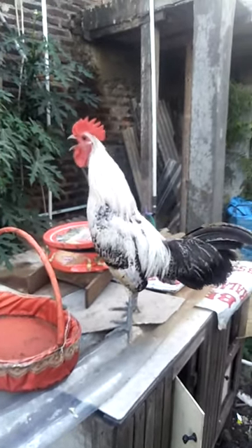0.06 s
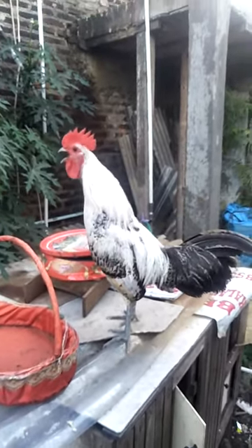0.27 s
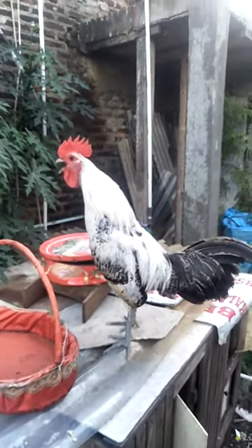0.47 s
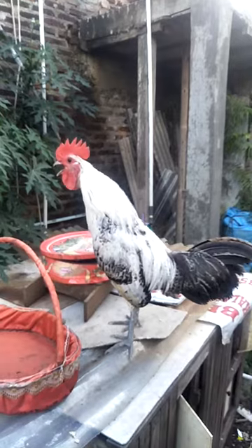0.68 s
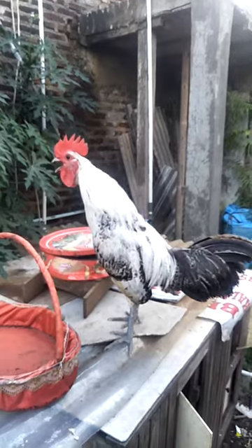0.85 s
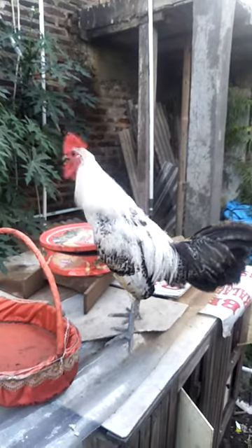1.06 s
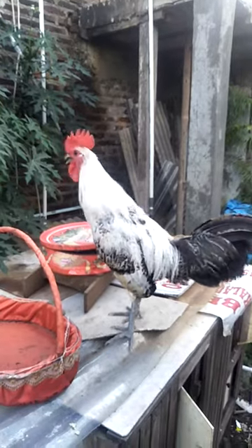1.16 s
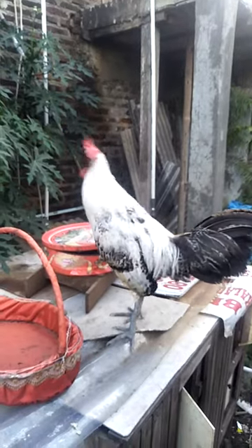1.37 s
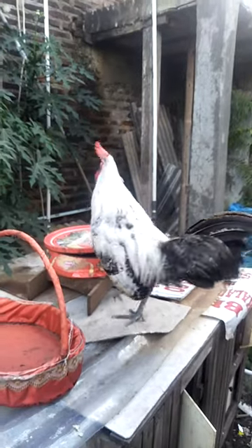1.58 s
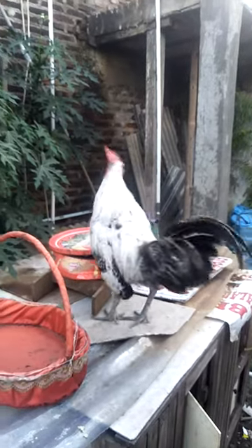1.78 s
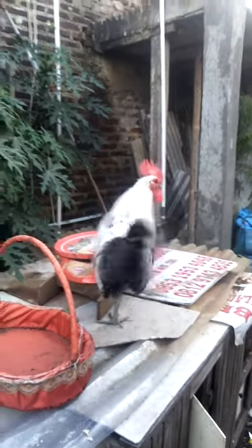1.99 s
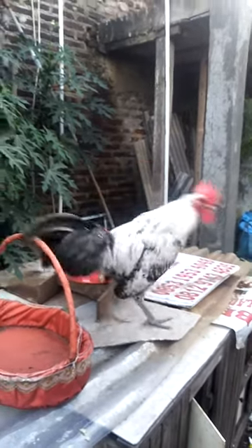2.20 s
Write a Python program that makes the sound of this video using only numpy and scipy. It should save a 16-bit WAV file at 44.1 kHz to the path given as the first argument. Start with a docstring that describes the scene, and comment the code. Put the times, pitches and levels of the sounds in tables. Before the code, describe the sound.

A rooster crows loudly up close, hoarse then clear, cracking into a soft sagging wheeze outdoors.

```python
"""A rooster in a walled yard

A rooster crows close by: a hoarse opening, a long clear note, a cracked fall, a soft sagging wheeze, then air.
Clear notes are sums of harmonics; hoarseness adds a second membrane beating with the voice, and noisy flapping.
Shaped noise makes the breath and the feet, which scuff and tap on the perch as he turns.
The walls add a short tail. A low rumble and a faint hiss lie under everything.
"""
import sys
import numpy as np
from scipy import signal
from scipy.fft import rfft, irfft
from scipy.io import wavfile
from scipy.ndimage import uniform_filter1d, minimum_filter1d, map_coordinates

SR = 44100
rng = np.random.default_rng(int(sys.argv[2]) if len(sys.argv) > 2 else 0)


def put_to_file(sound):
    """Save the sound as 16-bit audio at rate SR, in the file named by the first command-line argument."""
    columns = np.atleast_2d(sound).T  # one column per channel
    safe = np.clip(columns, -1, 1)
    whole_steps = np.round(safe * 32767)
    wavfile.write(sys.argv[1], SR, whole_steps.astype(np.int16))


N = 99225
T = np.arange(N) / SR  # time in seconds
EDGE_HZ = 15650  # top of the sound band
FADE_S = .008  # fade just outside the span of a table
JITTER_HZ = 85.6  # how fast pitch and loudness tremble in the harmonic notes


def amp(db):
    """Turns dB into a plain factor."""
    return 10 ** (np.asarray(db) / 20)


def unit(x):
    """Scales to an average strength (rms) of 1."""
    return x / np.sqrt(np.mean(x ** 2) + 1e-20)


def read(points, hz):
    """Reads a table of frequency and value on a log-frequency axis."""
    f, value = np.transpose(points)
    return np.interp(np.log(hz + 1), np.log(f + 1), value)


def curves(rows):
    """Gives a soft gate over the span of a table, then each column over time."""
    s, *columns = np.transpose(rows)
    gate = np.clip(np.minimum(T - s[0], s[-1] - T) / FADE_S + 1, 0, 1)
    return [np.sin(gate * np.pi / 2) ** 2] + [np.interp(T, s, c) for c in columns]


def colour(x, points):
    """Filters a sound by a spectrum; rms 1."""
    gain = amp(read(points, np.fft.rfftfreq(N, 1 / SR)))
    return unit(irfft(rfft(x) * gain, N))


def noise(points):
    """Makes coloured noise; rms 1."""
    return colour(rng.standard_normal(N), points)


def wander(rate_hz):
    """Drifts smoothly by chance, up to about the given rate; rms 1."""
    smoothing = 1 + (np.fft.rfftfreq(N, 1 / SR) / rate_hz) ** 4
    return unit(irfft(rfft(rng.standard_normal(N)) / smoothing, N))


def phase_of(hz, jitter, rate_hz):
    """Adds up the phase of an oscillator whose pitch trembles by the share jitter."""
    return 2 * np.pi * np.cumsum(hz * (1 + jitter * wander(rate_hz))) / SR


def burst(start, db, rise, decay):
    """Shapes a brief event: a straight rise, then an exponential decay."""
    t = np.maximum(T - start, 0)
    return amp(db) * np.minimum(t / rise, 1) * np.exp(-np.maximum(t - rise, 0) / decay)


def ring(hz, width_hz):
    """Air sounding one narrow resonance; rms 1."""
    turn = 2 * np.pi * hz * T
    return wander(width_hz) * np.cos(turn) + wander(width_hz) * np.sin(turn)


def flaps(hz, jitter, rate_hz, uneven, breath):
    """One pulse a cycle, uneven in time and strength, each with a puff of air."""
    phase = phase_of(hz, jitter, rate_hz)
    pulses = unit(sum(np.cos(k * phase) for k in range(1, 15)))
    pulses = pulses * (1 + uneven * wander(rate_hz))
    puffs = (1 + np.cos(phase)) * rng.standard_normal(N)
    return unit(pulses) + breath * unit(puffs)


def harmonic_note(rows, overtones, order, jitter, shimmer):
    """The lowest partials swell and fade as beak and neck move; overtones follow partial number order."""
    gate, hz, *levels = curves(rows)
    phase = phase_of(hz, jitter, JITTER_HZ)
    low = sum(amp(db) * np.cos(k * phase) for k, db in enumerate(levels, 1))
    high = 0
    for k in range(len(levels) + 1, 24):
        db = levels[order - 1] + read(overtones, k * hz) + 3.2 * wander(15)
        high += amp(db) * np.cos(k * phase) * (k * hz < EDGE_HZ)
    return np.sqrt(2) * gate * (low + high) * (1 + shimmer * wander(JITTER_HZ))


def unsteady_tone(rows, jitter):
    """A single tone of the voice, trembling in pitch and loudness."""
    gate, hz, db = curves(rows)
    wave = np.cos(phase_of(hz, jitter, rate_hz=140)) * (1 + 0.61 * wander(67))
    return gate * amp(db) * unit(wave)


# The long note, with a brief upward yodel.
# Each row: time in seconds, pitch in Hz, levels of partials 1 to 4 in dB.
LONG_NOTE = [(.517, 928.3, -21.5, -14, -34, -42), (.632, 935.4, -25, -13, -34, -42.5),
             (.644, 966, -24.5, -23.5, -43, -48), (.694, 951.4, -18, -18, -30, -43),
             (.712, 916.7, -22, -13, -36, -36), (.805, 917.3, -23.5, -14.5, -35.5, -41),
             (.85, 908.2, -16.5, -20.5, -29.5, -34), (.89, 910, -17, -18, -29, -37),
             (.924, 901.4, -15, -30.5, -28, -33), (1.015, 894.2, -16.5, -26.5, -25.5, -40.5),
             (1.05, 842, -12, -38.5, -58.5, -51), (1.073, 827, -25.5, -28.5, -53.5, -62)]
# Colour of its overtones. Each row: frequency in Hz, level in dB against partial 4.
LONG_NOTE_OVERTONES = [(4500, -34), (5500, -20), (6400, -13), (7400, -29.5), (8400, -35), (11800, -31),
                       (13900, -37.5), (15500, -53)]


def long_note():
    """The clear voice: harmonics of one pitch with only a slight tremble."""
    return harmonic_note(LONG_NOTE, LONG_NOTE_OVERTONES, order=4, jitter=0.0014, shimmer=0.017)


# Start of the voice. Each row: time in seconds, pitch in Hz, levels of partials 1 and 2 in dB.
OPENING = [(.1, 869.4, -40, -59.5), (.136, 926, -16.5, -21.5), (.16, 977, -27.5, -19),
           (.19, 985.5, -35, -17), (.225, 909.5, -31, -22), (.26, 939.8, -39, -20.5),
           (.29, 795, -25.5, -39), (.44, 826, -42.5, -37.5), (.495, 837.6, -17.5, -32.5)]
# Colour of its overtones. Each row: frequency in Hz, level in dB against partial 2.
OPENING_OVERTONES = [(2800, -22), (3600, -8.5), (4200, -35), (14000, -57.5)]


def opening():
    """The first membrane starts to sound, with a strong tremble in loudness."""
    return harmonic_note(OPENING, OPENING_OVERTONES, order=2, jitter=0.015, shimmer=.3)


# Second membrane in the hoarse opening; the rasp below borrows its pitch.
# Each row: time in seconds, pitch in Hz, level in dB (1 dB is taken off when played).
SECOND = [(.165, 1193, -23), (.205, 1201, -15.5), (.298, 1255, -14.5), (.36, 1240, -17.5),
          (.42, 1197, -13.5), (.458, 1204, -20.5), (.477, 1214, -16), (.51, 1199, -16), (.522, 1203, -47.5)]
# Balance of its partials. Each row: frequency in Hz, relative level in dB.
SECOND_PARTIALS = [(1230, -3.5), (2450, 5.5), (3700, -16), (4900, -37), (6200, -30.5), (12000, -52.5)]
# Slow beats of the membranes. Each row: beat rate as a share of the pitch, relative depth.
BEATS = [(.2, .9), (.335, .7), (.51, .45)]
# Throat resonances, for the sidebands here and the rasp. Each row: frequency in Hz, relative level in dB.
THROAT = [(480, -31.5), (680, -19.5), (810, -9), (950, -12), (1080, -14), (1200, -4), (1330, -8),
          (1420, -19.5), (1600, -9), (1980, 0), (2250, 2), (2480, -0.5), (2650, -10), (3200, -20),
          (3600, -11), (3900, -35), (4500, -44), (6100, -38), (8000, -55.5), (12200, -45), (14000, -68.5)]
CLUMP_DB, CLUMP_HZ = 2.6, 110  # depth and rate of the clumps in the hoarse sound


def second_membrane():
    """A higher tone beats against the first; its sidebands come and go as wandering strands."""
    gate, hz, db = curves(SECOND)
    phase = phase_of(hz, jitter=.006, rate_hz=90)
    partials = 0
    for k in range(1, 11):
        partials += amp(read(SECOND_PARTIALS, k * hz) + 2.8 * wander(22)) * np.cos(k * phase)
    sidebands = 0
    for share, depth in BEATS:
        beat = phase_of(hz * share, jitter=.05, rate_hz=14)
        for k in range(1, 11):
            for side in (-1, 1):  # below and above each partial
                strand = depth * amp(read(THROAT, (k + side * share) * hz) + 4 * wander(12))
                sidebands += strand * np.cos(k * phase + side * beat + 2 * np.pi * rng.random())
    level = amp(db + .8 * CLUMP_DB * wander(CLUMP_HZ / 2) - 1)
    return gate * level * unit(unit(partials) + unit(sidebands))


# Irregular flapping of the membranes. Each row: time in seconds, level in dB before clumping.
RASP = [(0, -41), (.07, -53), (.122, -28.5), (.158, -31), (.172, -20), (.40, -21.5), (.505, -20),
        (.522, -44), (.56, -52), (.628, -50), (.645, -36), (.695, -34.5), (.72, -54), (.985, -54)]


def rasp():
    """Chaotic flapping in clumps, through throat resonances that rise and fall with the second membrane."""
    gate, db = curves(RASP)
    hz = curves(SECOND)[1]
    flapping = colour(flaps(700, jitter=.3, rate_hz=450, uneven=0.21, breath=.5), THROAT)
    # playing it faster or slower moves pitch and resonances together
    stretched = map_coordinates(flapping, [np.cumsum(hz / hz.mean())], order=3, mode="wrap")
    return gate * amp(db + CLUMP_DB * wander(CLUMP_HZ)) * stretched


# A brief squeal as the second membrane sets in. Each row: time in seconds, pitch in Hz, level in dB.
SQUEAL = [(.168, 1303, -27.5), (.19, 1348, -20.5), (.232, 1330, -29)]


def squeal():
    """One high unsteady tone in the hoarse opening."""
    return unsteady_tone(SQUEAL, jitter=.005)


# The voice cracks as it falls. Each row: time in seconds, pitch in Hz, level in dB.
CRACK = [(.988, 1010, -45), (1.003, 993.4, -25.5), (1.02, 973.6, -25), (1.031, 908.4, -19.5),
         (1.045, 857, -24), (1.068, 845.6, -25), (1.08, 850, -36), (1.13, 843, -55)]
# Its harsh last burst. The one row: start in seconds, level in dB, rise in seconds, decay in seconds.
CRACK_END = (1.04, -22, 0.0081, 0.0149)
# Colour of both. Each row: frequency in Hz, relative level in dB.
CRACK_COLOUR = [(80, -31), (190, -13.5), (450, -20.5), (750, -5.5), (1400, -5), (1900, 4.5), (2500, -9),
                (3050, -27), (3450, -16), (4000, -21), (6300, -31.5), (8000, -48.5), (14000, -56.5)]


def crack():
    """The long note breaks into a falling rattle and ends on a harsh burst."""
    gate, hz, db = curves(CRACK)
    drive = flaps(hz, jitter=.025, rate_hz=220, uneven=.5, breath=.45)
    rattle = 1 + .6 * np.cos(phase_of(190, jitter=.15, rate_hz=60))
    falling = gate * amp(db) * colour(drive * rattle, CRACK_COLOUR)
    return falling + burst(*CRACK_END) * noise(CRACK_COLOUR)


# A falling squeak in that last burst. Each row: time in seconds, pitch in Hz, level in dB.
SQUEAK = [(1.066, 2255, -26.5), (1.073, 1966, -29)]


def squeak():
    """One very short, high, falling tone."""
    return unsteady_tone(SQUEAK, jitter=.02)


# The wheeze, flipping register at 1.47 s.
# Each row: time in seconds, pitch in Hz, levels of partials 1 to 6 in dB.
WHEEZE = [(1.135, 626, -49.5, -42, -65, -59, -55, -58), (1.18, 659, -40, -46.5, -51, -48.5, -41, -70),
          (1.28, 674.7, -36.5, -39, -43.5, -47, -43, -67), (1.385, 661.3, -38, -43.5, -45, -54, -50.5, -69),
          (1.432, 674.5, -34, -51, -63, -44, -73, -70), (1.457, 682, -31.5, -50, -61, -73, -73, -73),
          (1.482, 637.7, -53, -33.5, -58, -66, -44, -69),
          (1.555, 639.5, -57.5, -34, -49.5, -69, -49.5, -70), (1.61, 616, -55.5, -50, -59, -68.5, -63, -76),
          (1.69, 612, -65, -56.5, -83, -82, -95, -90)]
# Colour of its overtones. Each row: frequency in Hz, level in dB against partial 3.
WHEEZE_OVERTONES = [(4700, -31), (7400, -35), (15000, -48)]


def wheeze():
    """A soft, lower harmonic note that sags; the flip trades strength between its partials."""
    return harmonic_note(WHEEZE, WHEEZE_OVERTONES, order=3, jitter=0.004, shimmer=0.062)


# The last low moan. Each row: time in seconds, pitch in Hz, level in dB.
MOAN = [(1.61, 587, -72), (1.66, 542, -50), (1.77, 525.5, -58.5)]


def moan():
    """One low, sagging, unsteady tone as the voice runs out."""
    return unsteady_tone(MOAN, jitter=.035)


# Hollow rush before the crow. Each row: resonance in Hz, level at the start in dB.
RUSH = [(500, -55.5), (960, -45), (1320, -44), (3800, -50)]
RUSH_DECAY_S = 0.05
# Air in the throat around the wheeze. Each row: time in seconds, level in dB before fluttering.
AIR = [(1.12, -74), (1.135, -47), (1.175, -47), (1.21, -59), (1.55, -86), (1.6, -55.5), (1.66, -58.5),
       (1.72, -68), (1.88, -73)]
# Colour of that air. Each row: frequency in Hz, relative level in dB.
AIR_COLOUR = [(380, -20), (540, -1), (950, 4), (1250, -11.5), (1680, -4.5), (3400, -10), (4300, -20.5),
              (12000, -52)]
# Last puffs of air. Each row: start in seconds, level in dB before fluttering, resonance in Hz.
PUFFS = [(1.731, -52.5, 3310), (1.784, -51.5, 2715)]
PUFF_RISE_S, PUFF_DECAY_S = 0.0094, .027


def air():
    """A hollow rush of resonances before the crow; fluttering air and whistling puffs around its end."""
    gate, db = curves(AIR)
    rush = sum(amp(level) * ring(hz, width_hz=110) for hz, level in RUSH)
    rush = rush * np.exp(-T / RUSH_DECAY_S)
    flutter = amp(2.5 * wander(101.4)) * noise(AIR_COLOUR)
    puffs = 0
    for start, level, hz in PUFFS:
        whistling = flutter + 0.57 * ring(hz, width_hz=73)
        puffs += burst(start, level, PUFF_RISE_S, PUFF_DECAY_S) * whistling
    return rush + gate * amp(db) * flutter + puffs


# Claws scraping. Each row: start in seconds, level in dB, decay in seconds.
SCRAPES = [(1.582, -59, 0.0017), (2.163, -53.5, 0.02)]
# Colour of the scrapes. Each row: frequency in Hz, relative level in dB.
SCRAPE_COLOUR = [(1000, -25), (1700, -16), (4300, 3), (6000, -10), (15000, -16)]
# Feet on the perch. Each row: start in seconds, level in dB, rise in seconds, decay in seconds.
STEPS = [(2.167, -42, 0.0044, 0.021), (2.2259, -34.5, 0.00018, 0.00096)]
# Colour of the steps. Each row: frequency in Hz, relative level in dB.
STEP_COLOUR = [(150, -10.5), (450, 8.5), (1100, 1.5), (2200, -8), (5500, -36), (14000, -44)]


def feet():
    """Claws scrape, a foot lands, a claw taps: short bursts of coloured noise."""
    scrapes = sum(burst(start, db, 0.0014, decay) for start, db, decay in SCRAPES)
    steps = sum(burst(*row) for row in STEPS)
    return scrapes * noise(SCRAPE_COLOUR) + steps * noise(STEP_COLOUR)


# How long the tail lasts. Each row: frequency in Hz, time to die by 60 dB in seconds.
YARD_T60 = [(1000, .28), (14000, 0.055)]
YARD_DB = -18  # level of the tail against the direct sound


def yard(x):
    """A short tail from the walls: scattered echoes, each band dying at its own speed."""
    size = SR // 2
    taps = rng.standard_normal(size) * (rng.random(size) < .08) * (np.arange(size) > .005 * SR)
    hz, t, z = signal.stft(taps, SR, nperseg=256)
    dying = amp(-60 * t / read(YARD_T60, hz)[:, None])
    tail = signal.istft(z * dying, SR, nperseg=256)[1]
    return signal.fftconvolve(x, tail / np.linalg.norm(tail))[:N]


# Colour of the low rumble. Each row: frequency in Hz, relative level in dB.
RUMBLE = [(20, -25), (70, -2), (185, -0.5), (250, -10), (420, -39.5), (900, -74)]
# Slow level change of the rumble. Each row: time in seconds, change in dB against RUMBLE_DB.
RUMBLE_CHANGE = [(.15, 5.5), (.27, -2.5), (.72, -3.5), (.85, 4)]
# Colour of the faint hiss. Each row: frequency in Hz, relative level in dB.
HISS = [(2200, -2.5), (9400, -13.5), (10300, 2.5), (11200, -14)]
RUMBLE_DB, HISS_DB = -56, -75.5


def background():
    """Steady faint hiss, and a low rumble, weaker from about 0.27 to 0.72 s."""
    rumble_db = RUMBLE_DB + np.interp(T, *np.transpose(RUMBLE_CHANGE))
    return amp(rumble_db) * noise(RUMBLE) + amp(HISS_DB) * noise(HISS)


def scene():
    """The rooster, his yard and the background."""
    clear = long_note() + wheeze()
    hoarse = opening() + second_membrane() + squeal() + rasp() + crack() + squeak()
    bird = clear + hoarse + moan() + air() + feet()
    return (bird + amp(YARD_DB) * yard(bird) + background())[None]


def record(dry):
    """A quick limiter holds down the peaks of the crow; then a filter cuts the top of the band."""
    ceiling_db = -4.5
    gain = np.minimum(amp(ceiling_db) / (abs(dry) + 1e-9), 1)
    smooth_gain = uniform_filter1d(minimum_filter1d(gain, size=90), size=90)  # about 2 ms each
    low_pass = signal.firwin(511, EDGE_HZ, window=("kaiser", 9), fs=SR)
    return signal.oaconvolve(dry * smooth_gain, low_pass[None], "same")


dry = scene()
out = record(dry)
put_to_file(out)
```